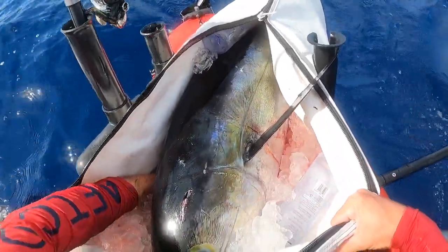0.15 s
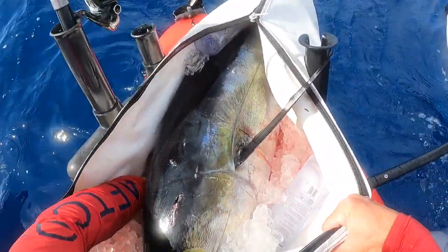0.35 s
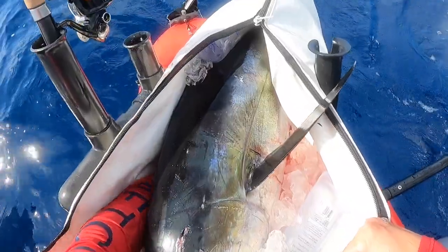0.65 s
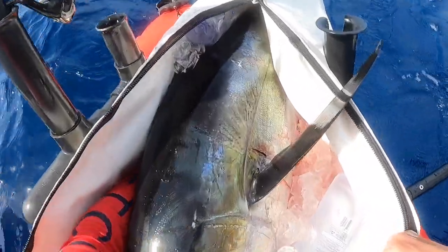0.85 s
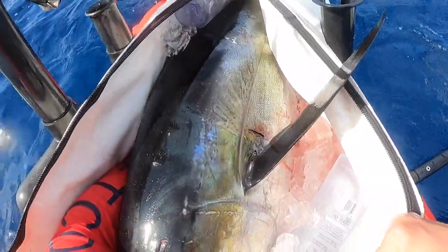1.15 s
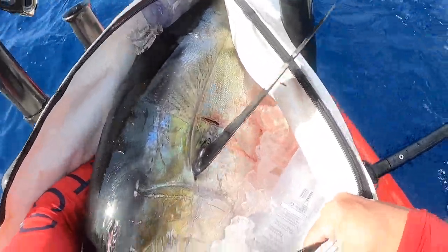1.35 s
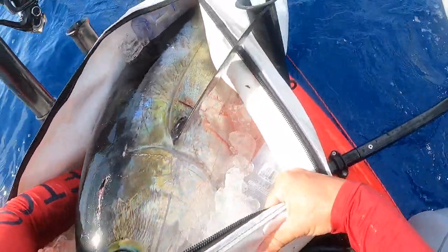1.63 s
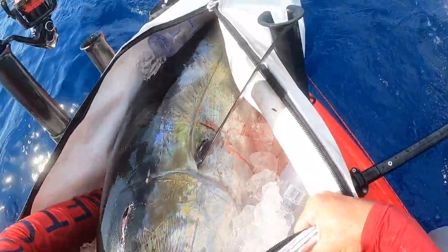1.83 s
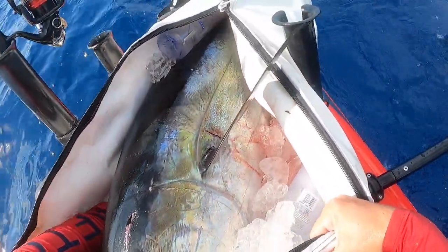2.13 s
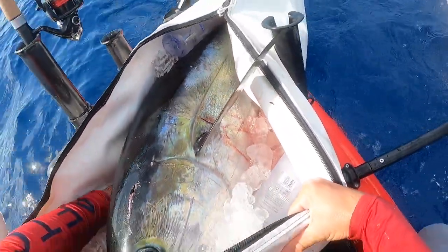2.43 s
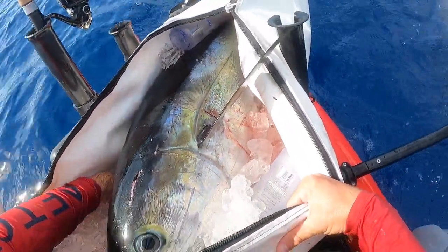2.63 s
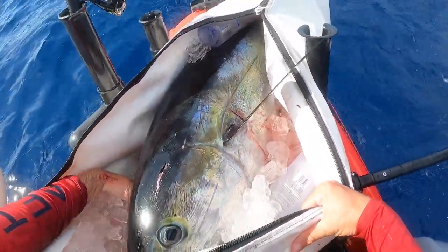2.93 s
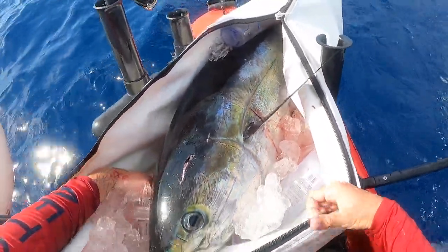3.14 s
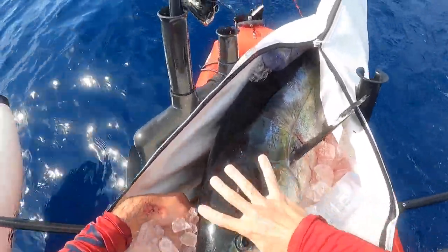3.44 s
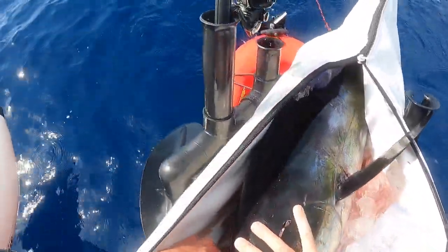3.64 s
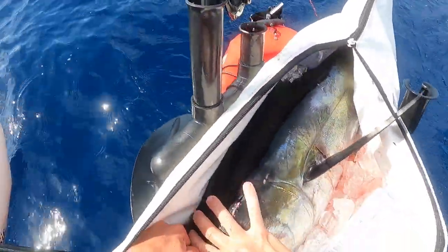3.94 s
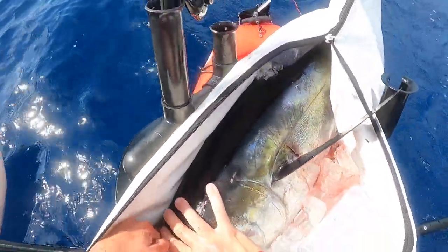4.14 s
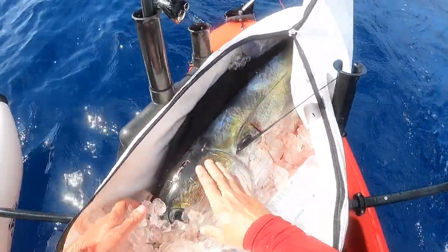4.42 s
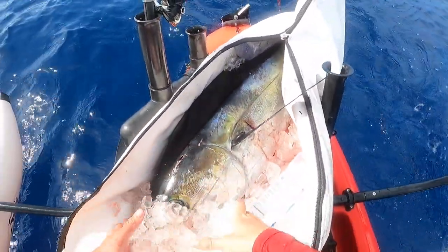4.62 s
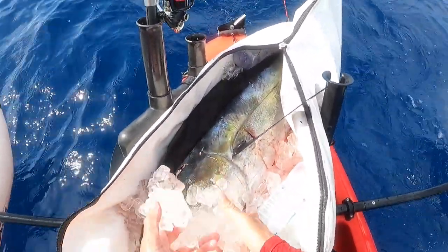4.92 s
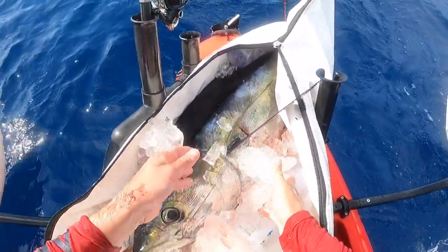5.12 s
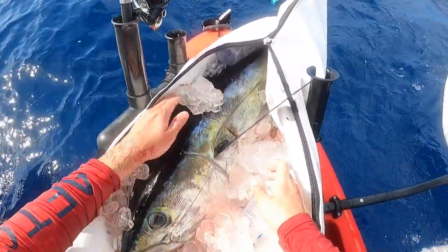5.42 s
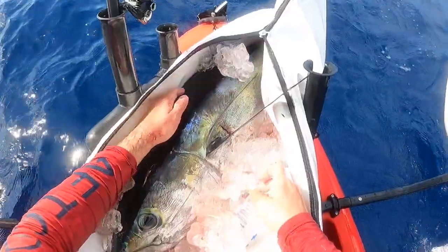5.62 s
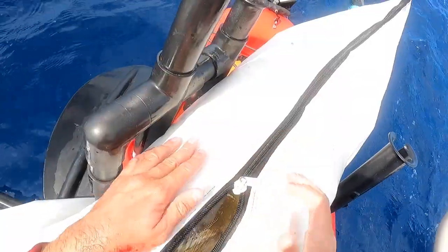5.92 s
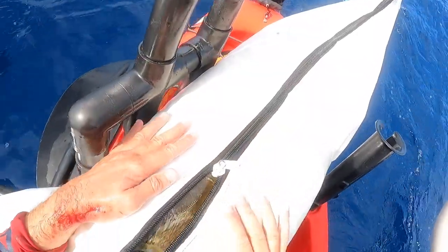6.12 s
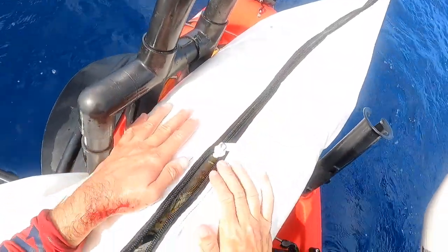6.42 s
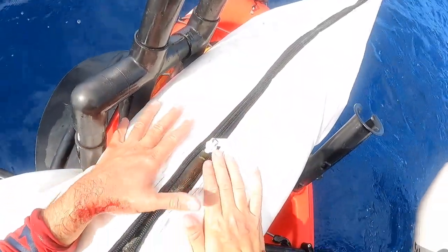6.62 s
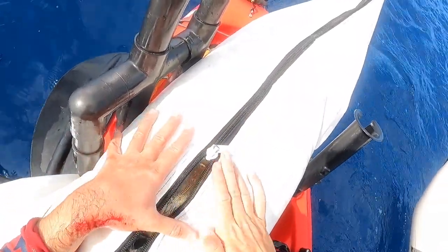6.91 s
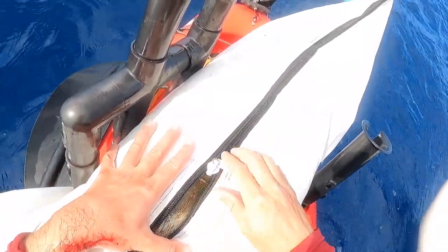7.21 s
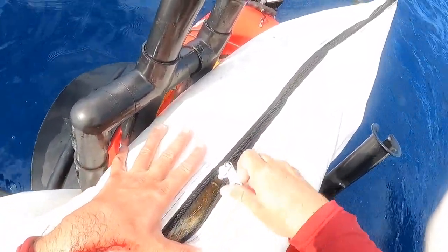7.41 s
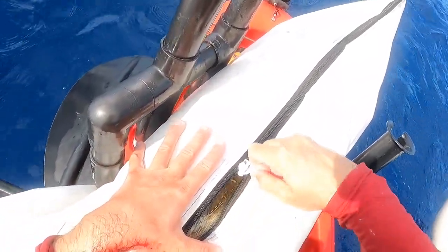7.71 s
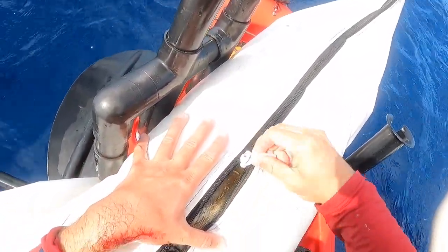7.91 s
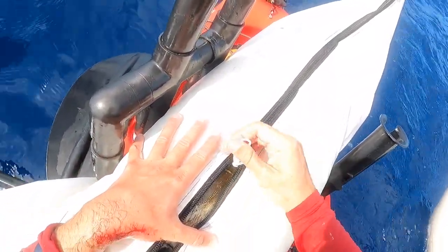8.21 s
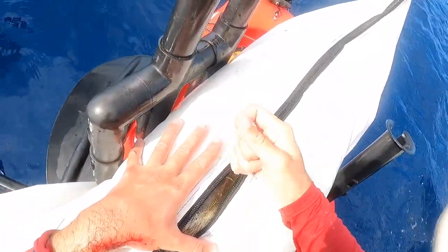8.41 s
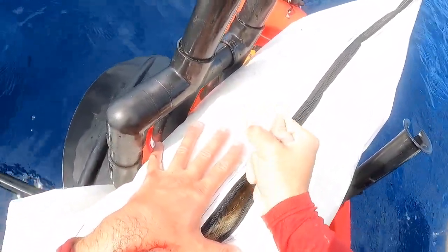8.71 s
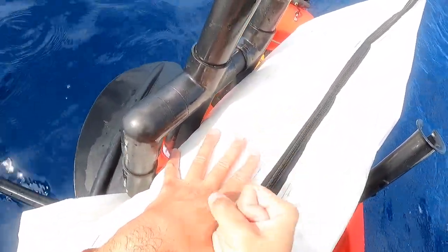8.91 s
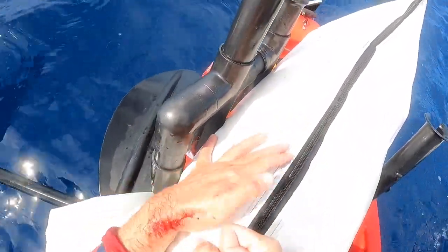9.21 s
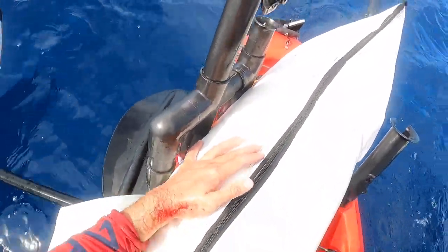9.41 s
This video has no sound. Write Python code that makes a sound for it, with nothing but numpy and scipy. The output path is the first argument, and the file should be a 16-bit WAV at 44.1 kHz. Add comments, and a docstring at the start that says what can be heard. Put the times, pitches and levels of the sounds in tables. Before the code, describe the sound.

Close to the microphone and outdoors, waves slosh against a hull under gusty low wind. Ice is raked over a fish in a padded bag, in dull shoves with sharp cube clatters. Then fabric rustles and ticks, damp palms stutter in low groans, a zipper tab clinks brightly, teeth tock slowly and quick zips finish. Almost mono first, a little wider later, dry.

```python
"""On a kayak at sea, water washes along the hull and wind buffets the microphone.
Hands rake ice over a fish in an insulated bag, judder over its wet cover, then tug the heavy
zipper shut in short strokes; the metal pull tab clinks in between. Wind, water and rubbing are
shaped noise, with tiny damped rings in all but the wind; impacts are noise bursts in resonators;
strokes are stick-slip pulse trains driving the bag panel, the slider and the teeth."""
import sys
import numpy as np
from scipy import signal
from scipy.fft import rfft, irfft, next_fast_len
from scipy.io import wavfile
from scipy.ndimage import map_coordinates

SR = 44100
rng = np.random.default_rng(int(sys.argv[2]) if len(sys.argv) > 2 else 0)


def log_audio(samples):
    """Write samples as a 16-bit WAV file to the path given in sys.argv[1]."""
    # one column per channel
    frames = np.atleast_2d(samples).T
    # limit to full scale, then quantise
    limited = np.clip(frames, -1, 1)
    pcm = np.round(limited * 32767).astype(np.int16)
    wavfile.write(sys.argv[1], SR, pcm)


N = 421155  # length in samples


def amp(db):
    """Logarithmic level: decibels to amplitude gain."""
    return 10 ** (np.asarray(db) / 20)


def unit(x):
    """Normalisation by power: scale to rms 1."""
    return x / np.sqrt(np.mean(x ** 2) + 1e-20)


def peaked(x):
    """Normalisation by crest: scale to peak 1."""
    return x / (np.abs(x).max() + 1e-20)


def curves(rows, outside=None):
    """Linear interpolation: one value per sample for each column after the time."""
    s, *columns = np.transpose(rows)
    t = np.arange(N) / SR
    return [np.interp(t, s, column, outside, outside) for column in columns]


def wobble(rate, size=N):
    """Band-limited fluctuation: a smooth random curve with `rate` knots a second."""
    knots = rng.standard_normal(int(size * rate / SR) + 4)
    return map_coordinates(knots, [np.arange(size) * rate / SR])


def filtered(x, response):
    """Linear filtering: the spectrum of x times a response of frequency."""
    n = x.shape[-1]
    m = next_fast_len(n + SR // 8)
    return irfft(rfft(x, m) * response(np.fft.rfftfreq(m, 1 / SR)), m)[..., :n]


def colour(points, hz):
    """Spectral envelope: gain through (Hz, dB) points, interpolated over log frequency."""
    f, db = np.transpose(points)
    return amp(np.interp(np.log(hz + 1), np.log(f + 1), db))


def ring(x, modes):
    """Modal superposition: parallel (Hz, width, dB) resonances, alternating in sign."""
    def response(f):
        total = 0
        for k, (centre, width, db) in enumerate(modes):
            damping = 1j * f * width
            total = total + (-1) ** k * amp(db) * damping / (centre * centre - f * f + damping)
        return total
    return filtered(x, response)


def soften(x, edge_hz, order=2):
    """High-frequency loss: a causal low-pass."""
    return signal.sosfilt(signal.butter(order, min(edge_hz, SR / 2 - 1), fs=SR, output="sos"), x)


def add(track, s, x):
    """Superposition: mix x into the track at time s."""
    part = track[max(round(s * SR), 0):][:len(x)]
    part += x[:len(part)]


def burst(t60):
    """Impact excitation: noise that decays exponentially by 60 dB in t60 seconds."""
    t = np.arange(SR // 8) / SR
    return rng.standard_normal(len(t)) * amp(-60 * t / t60)


def swells(rows, attack_s, release_s):
    """Energy addition: overlapping swells in dB; attack and release each span 20 dB."""
    t = np.arange(0, N, 64) / SR
    start, hold, *levels = np.transpose(rows)[:, :, None]
    before = np.maximum(start - t, 0) / attack_s
    after = np.maximum(t - start - hold, 0) / release_s
    fade_db = -20 * (before + after)
    totals = [10 * np.log10(np.sum(amp(db + fade_db) ** 2, axis=0) + 1e-12) for db in levels]
    return curves(np.transpose([t] + totals))


def grains(rate, cycles, spread_db, glide):
    """Granular superposition: tiny damped rings of random pitch and size, flat in spectrum, rms 1."""
    when, pitch, size, life = rng.random((int(rate * N / SR), 4)).T[:, :, None]
    hz = np.geomspace(150, 14000, 1024)[(pitch * 1023).astype(int)]
    k = np.arange(SR // 100)
    age = k * hz / SR / (cycles * (.5 + life))
    # an exponential spread of levels; the factor hz flattens the spectrum
    strength = amp(spread_db * np.minimum(-np.log(1 - size), 4)) * hz
    tone = np.sin(2 * np.pi * hz * k / SR * (1 + glide * np.minimum(age, 2)))
    waves = strength * np.exp(-age) * (1 - k / len(k)) * tone
    return unit(np.bincount(((when * N).astype(int) + k).ravel(), waves.ravel())[:N])


def texture(levels_db, spectrum, grain, share, split_hz, flutter_db):
    """Two-band modulation: grains on noise, low and high parts fluttering partly together."""
    share = np.clip(share, 0, 1)
    source = np.sqrt(share) * grain + np.sqrt(1 - share) * rng.standard_normal(N)

    def low(hz):
        return 1 / (1 + (hz / split_hz) ** 4)
    body = unit(filtered(source, lambda hz: colour(spectrum, hz) * low(hz)))
    top = unit(filtered(source, lambda hz: colour(spectrum, hz) * (1 - low(hz))))
    shared = wobble(45)
    out = np.zeros(N)
    for part, db in zip((body, top), levels_db):
        out = out + part * amp(db + flutter_db * (shared + wobble(70)))
    return out


# Spectrum of the buffeting. Each row: frequency in Hz, relative density in dB per Hz.
BUFFET_SPECTRUM = [(15, 2.5), (38, 3), (100, -2), (220, -21), (480, -62.5)]
# The breeze between gusts, dropping late on. Each row: time in seconds, level in dB before flutter.
BREEZE_LEVELS = [(1, -48.5), (3.0, -36), (5.6, -41), (7.3, -53.5), (8.3, -56), (9.3, -47)]
# Gusts on the microphone. Each row: start in seconds, hold in seconds, level in dB before flutter.
WIND_GUSTS = [(0.05, 0.68, -29), (3.52, 0.58, -23), (4.33, 0.095, -28), (4.74, 0.65, -34),
              (5.82, 0.11, -36.5), (6.06, 0.26, -27), (6.8, 1.0, -42.5), (9.42, 0.13, -30.5)]
GUST_ATTACK_S, GUST_RELEASE_S = 0.062, 0.16


def wind():
    """Turbulent pressure: lumpy low buffeting in gusts over a breeze, partly different at each port."""
    ports = unit(filtered(rng.standard_normal((2, N)), lambda hz: colour(BUFFET_SPECTRUM, hz)))
    breeze = amp(curves(BREEZE_LEVELS)[0])
    gusts = amp(swells(WIND_GUSTS, GUST_ATTACK_S, GUST_RELEASE_S)[0])
    strength = np.hypot(breeze, gusts)
    mid, side = ports * strength * amp(2.1 * wobble(15))
    return mid + np.array([side, -side]) * amp(-9.0)


# Spectrum of the wash. Each row: frequency in Hz, relative density in dB per Hz.
WASH_SPECTRUM = [(60, -10.5), (180, 0.5), (350, -4.5), (1100, -6.5), (1800, -5.5), (2800, -12.5),
                 (3800, -16.5), (8500, -31.5), (11000, -47), (15500, -55)]
# Waves along the hull, the first a long low wash under the rest.
# Each row: start in seconds, hold in seconds, slosh (low band) and spray (high band) in dB before flutter.
HULL_WAVES = [(0, 2.75, -34, -40.5), (1.125, 0.08, -23.5, -27.5), (1.1, 1.61, -34, -36),
              (1.41, 0.027, -27.5, -31), (1.55, 0.26, -27, -30), (1.65, 0.065, -27.5, -28.5),
              (1.87, 0.14, -31, -31.5)]
WAVE_ATTACK_S, WAVE_RELEASE_S = 0.084, .12


def water():
    """Bubble resonance: a wash full of small bubbles whose pitch rises as they surface."""
    bubbles = grains(rate=600, cycles=5, spread_db=3, glide=0.08)
    levels_db = swells(HULL_WAVES, WAVE_ATTACK_S, WAVE_RELEASE_S)
    return texture(levels_db, WASH_SPECTRUM, bubbles, share=0.17, split_hz=974, flutter_db=1.0)


# How loosely the cubes tumble. Each row: time in seconds, looseness from 0 to 1.
LOOSENESS = [(.3, 0.63), (2.7, 0.32), (3.4, 0.11), (4.15, 0.17), (4.65, 0.37), (5.4, 0.37)]
# Spectrum of raked ice. Each row: frequency in Hz, relative density in dB per Hz.
RAKE_SPECTRUM = [(60, -29), (130, -4.5), (700, -7), (1600, -15.5), (3800, -19), (8500, -33), (11000, -47.5),
                 (15500, -56)]
# A hand rakes through the ice. Each row: start in seconds, hold in seconds, shove level in dB before flutter.
ICE_SCOOPS = [(0, 0.663, -45), (.11, 0.27, -40.5), (2.48, 0.1, -40), (2.665, 0.052, -28),
              (2.975, 0.13, -28), (3.21, 0.16, -34.5), (3.59, 0.11, -30.5), (3.81, 0.15, -21),
              (4.03, 0.098, -32.5), (4.48, 0.0081, -32), (4.66, 0.036, -31), (4.77, 0.099, -26.5),
              (5.02, 0.013, -26.5), (5.19, 0.024, -38), (5.29, 0.076, -29), (5.755, 0.027, -43)]
# Cubes keep settling between scoops. Each row: start in seconds, hold in seconds, level in dB before flutter.
ICE_SETTLING = [(2.877, 2.544, -35.5), (5.447, 0.18, -41)]
SCOOP_ATTACK_S, SCOOP_RELEASE_S = 0.077, 0.1
CRUNCH_DB, LOOSE_CRUNCH_DB = -12, 23.5  # crunch over shove in packed ice; what fully loose ice adds


def raked_ice():
    """Granular collisions: packed cubes crunch dully; loose ones clatter and sound brighter."""
    clicks = grains(rate=800, cycles=3.3, spread_db=3.0, glide=0)
    loose, = curves(LOOSENESS)
    shove_db, = swells(ICE_SCOOPS + ICE_SETTLING, SCOOP_ATTACK_S, SCOOP_RELEASE_S)
    crunch_db = shove_db + CRUNCH_DB + LOOSE_CRUNCH_DB * loose
    return texture((shove_db, crunch_db), RAKE_SPECTRUM, clicks, share=.35, split_hz=1560, flutter_db=1.6)


KNOCK_SAG, KNOCK_CYCLES = 0.96, 1.64  # share by which pitch falls; peak, in cycles of the starting pitch


def knock(hz):
    """Yielding panel: a blow on the padded bag, a few cycles whose pitch drops as the panel gives."""
    cycles = np.arange(SR // 8) / SR * hz * np.exp(0.12 * rng.standard_normal())
    age = cycles / KNOCK_CYCLES
    phase = cycles * (1 - KNOCK_SAG) + KNOCK_SAG * 2 * KNOCK_CYCLES * (1 - np.exp(-age / 2))
    return peaked(age * np.exp(-age) * np.sin(2 * np.pi * phase))


# Single cubes landing. Each row: time in seconds, crack peak in dB, knock in dB relative to the crack.
CUBE_LANDINGS = [(0.512, -25.5, 8), (2.6695, -13, -6), (3.066, -17, -9), (5.1026, -20.5, -1),
                 (5.199, -15, -3), (5.2134, -13, -18), (5.2853, -15, -2), (5.298, -21, 10.5),
                 (5.34, -10, -8), (5.3655, -15.5, 8.5), (5.384, -25, 11.5), (5.4471, -16.5, -9),
                 (5.523, -17.5, -9), (5.808, -22, -27), (6.598, -27.5, 11)]


def cubes():
    """Modal impact: each cube cracks at its own pitch and knocks the padded bag."""
    out = np.zeros(N)
    for s, db, knock_db in CUBE_LANDINGS:
        pitches = np.array([1100, 2250, 3370, 4680, 7920]) * np.exp(0.14 * rng.standard_normal(5))
        crack = soften(ring(burst(0.022), [(hz, 300, 0) for hz in pitches]), 5500, order=3)
        add(out, s, amp(db) * (peaked(crack) + amp(knock_db) * knock(587)))
    return out


# Small crests slap the hull. Each row: time in seconds, peak in dB.
HULL_SLAPS = [(.776, -18), (1.052, -12.5)]


def slaps():
    """Damped impact: a crest breaks on the hull in one short wet smack."""
    out = np.zeros(N)
    for s, db in HULL_SLAPS:
        smack = soften(ring(burst(0.069), [(660, 340, 0)]), 3300)
        add(out, s, amp(db) * peaked(smack))
    return out


WANDER_OCTAVES, WANDER_PER_S = .045, 80  # random drift of the slip rate: spread, knots per second
STROKE_PAD = SR // 20  # samples left for a stroke to ring out


def slip_train(rate, jitter, size_db):
    """Stick-slip: one pulse per slip or tooth at the given rate per sample, then room to ring out."""
    rate = rate * 2 ** (WANDER_OCTAVES * wobble(WANDER_PER_S, size=len(rate)))
    at = np.flatnonzero(np.diff(np.floor(np.cumsum(rate) / SR + .5)))
    slip, size = rng.standard_normal((len(at), 2)).T
    when = np.clip(at + jitter * slip * SR / rate[at], 0, len(rate)).astype(int)
    return np.bincount(when, amp((size_db + 3.5 * jitter) * size), len(rate) + STROKE_PAD)


# Resonances of the bag, slider and teeth. Each row: frequency in Hz, width in Hz, relative gain in dB.
BAG_MODES = [(113, 53, -2.5), (164, 106, -4.5)]
SLIDER_MODES = [(971, 150, 10.6), (1390, 280, 0.68), (1696, 180, 3.4)]
TEETH_MODES = [(2070, 650, 3), (3910, 250, 0.5), (6250, 4300, -2.5)]


def stroke(slips, rate, jitter, panel_hz, thump_gain, panel_db, slider_db, rasp_db):
    """Source and resonators: each slip shakes the bag panel, rings the zipper slider and scrapes."""
    decay = amp(-60 * np.arange(SR // 50) / SR / .013)
    scrape = signal.fftconvolve(slips, decay)[:len(slips)]
    scrape *= rng.standard_normal(len(slips))
    # the tauter the fabric is held, the higher the panel rings
    push = slips + (0.023 + 0.51 * abs(jitter)) * scrape
    panel = soften(ring(push, [(panel_hz, 0.79 * panel_hz, 0)]), 2.19 * panel_hz, order=3)
    # the scrape also thumps the whole bag
    thump = soften(ring(scrape, BAG_MODES), 380)
    # each new grip shifts the slider's resonances a little
    modes = [(hz * np.exp(.03 * rng.standard_normal()), width, db) for hz, width, db in SLIDER_MODES]
    slider = soften(ring(slips + .06 * scrape, modes), 2420, order=4)
    # faster and rougher slips scrape more brightly
    rasp = soften(ring(slips + 0.15 * scrape, TEETH_MODES), 14 * rate * (1 + 12 * abs(jitter)))
    rasp = soften(rasp, 9160, order=5)
    sound = amp(panel_db) * (unit(panel) + thump_gain * unit(thump))
    sound += amp(slider_db) * unit(slider) + amp(rasp_db) * unit(rasp)
    return np.sqrt(1 - STROKE_PAD / len(slips)) * sound


# Quick runs of a wet finger or of the slider over the teeth.
# Each row: slider and rasp in dB relative to the panel, then a list of points.
# Each point: time in seconds, nominal slips per second, panel level in dB.
QUICK_PULLS = [(-9, -21, [(3.25, 520, -34), (3.46, 285, -33)]), (-10.5, -17, [(7.149, 256, -27),
               (7.185, 490, -22.5), (7.205, 410, -34)]), (-1, -14, [(7.322, 410, -39), (7.338, 330, -27),
               (7.362, 580, -26), (7.395, 246, -28.5), (7.428, 550, -30), (7.445, 490, -43)]),
               (4, -7, [(8.226, 234, -51), (8.305, 140, -45.5)]), (-2.5, -12, [(8.925, 144, -26),
               (8.965, 171, -21.5), (8.985, 500, -21.5), (9.0, 400, -20.5), (9.025, 555, -20),
               (9.04, 405, -21.5), (9.062, 244, -28), (9.1, 480, -30)]), (-3, -10.5, [(9.115, 300, -31),
               (9.145, 450, -25.5), (9.175, 405, -27), (9.195, 310, -37)]),
               (-3.5, -8.5, [(9.315, 130, -26.5), (9.35, 316, -22.5), (9.378, 350, -22.5),
               (9.465, 432, -19.5), (9.49, 360, -20.5), (9.508, 366, -18.5), (9.525, 263, -22),
               (9.55, 210, -20.5)])]
PULL_JITTER, RUN_PANEL_HZ = .017, 500  # share of a slip period; resonance of the taut panel
PULL_THUMP_DB, RASP_DB_PER_OCTAVE = -10.5, 4  # the bag booms along; faster teeth scrape more


def pulls():
    """Stick-slip under tension: quick runs sing in the taut panel and rasp as they speed up."""
    out = np.zeros(N)
    for slider_db, rasp_db, points in QUICK_PULLS:
        s, rates, levels = np.transpose(points)
        t = np.arange(s[0] * SR, s[-1] * SR + STROKE_PAD) / SR
        rate, db = np.interp(t, s, rates), np.interp(t, s, levels)
        slips = slip_train(rate[:-STROKE_PAD], PULL_JITTER, size_db=1)
        rasp = db + rasp_db + RASP_DB_PER_OCTAVE * np.log2(rate / rate.mean())
        thump = amp(PULL_THUMP_DB)
        add(out, s[0], stroke(slips, rate.mean(), PULL_JITTER, RUN_PANEL_HZ, thump, db, db + slider_db, rasp))
    return out


# Spectrum of the rubbed cover. Each row: frequency in Hz, relative density in dB per Hz.
RUSTLE_SPECTRUM = [(70, -9.5), (150, -3), (300, -9), (1000, -16), (6500, -20), (9000, -29), (11500, -48),
                   (15500, -57)]
# Palms press and slide on the cover, the first a light touch throughout.
# Each row: start in seconds, hold in seconds, rub (low band) and rustle (high band) in dB before flutter.
PALM_PRESSES = [(5.75, 4.5, -45.5, -54.5), (5.88, 0.8, -39, -47.5), (6.27, 0.11, -30.5, -42.5),
                (6.8, 0.42, -34.5, -50.5), (7.78, 0.058, -42, -78), (8.01, 0.11, -49, -80),
                (8.92, 0.72, -37.5, -49.5)]
PRESS_ATTACK_S, PRESS_RELEASE_S = 0.062, 0.093


def cover():
    """Friction noise: the stiff fabric rubs and crackles under the palms, spread a little to both sides."""
    levels_db = swells(PALM_PRESSES, PRESS_ATTACK_S, PRESS_RELEASE_S)

    def patch():
        """Crumpling: one independent patch of rub and crackle."""
        crackle = filtered(grains(rate=900, cycles=5, spread_db=5, glide=0), lambda hz: hz > 1000)
        return texture(levels_db, RUSTLE_SPECTRUM, crackle, share=0.39, split_hz=1410, flutter_db=2.5)
    return patch() + patch() * amp(-15.5) * np.array([[1], [-1]])


# The stiff cover snaps. Each row: time in seconds, peak in dB before panning.
COVER_SNAPS = [(6.013, -20), (6.608, -23), (6.659, -29), (6.81, -27), (8.395, -27.5), (9.229, -42)]


def snaps():
    """Snap-through buckling: a crease of the stiff cover flips with a dry tick."""
    out = np.zeros(N)
    for s, db in COVER_SNAPS:
        tick = soften(ring(burst(0.0086), [(2600, 1500, 0)]), 5800)
        add(out, s, amp(db) * peaked(tick))
    return out


# Resonances of the tab. Each row: frequency in Hz, width in Hz, mean relative gain in dB.
METAL_MODES = [(4400, 600, -0.5), (5250, 700, -2), (6720, 430, 10.5), (9200, 165, 6)]
# Pull tab clinks. Each row: time in seconds, clink peak in dB before panning, thud in dB relative
# to the clink, treble edge in Hz (low when a finger damps the tab).
TAB_CLINKS = [(6.039, -20.5, -31, 14000), (6.061, -21, -19, 14000), (7.329, -19, -35, 11000),
              (7.415, -20, -30, 14000), (7.426, -13.5, -38, 14000), (7.4466, -19, -37, 14000),
              (7.7623, -8.5, -12, 13900), (8.359, -13.5, -44, 5700), (8.519, -15.5, -13.5, 14000)]
# Let go, the tab rings freely. Each row: time in seconds, peak in dB before panning.
FREE_TAB_RINGS = [(8.447, -24.5)]


def pull_tab():
    """Modal impact: the metal tab clinks on the slider, newly coloured each time, and thuds on the bag."""
    out = np.zeros(N)
    for s, db, thud_db, edge_hz in TAB_CLINKS:
        modes = [(hz, width, level + 1.0 * rng.standard_normal()) for hz, width, level in METAL_MODES]
        clink = soften(ring(burst(0.018), modes), edge_hz, order=8)
        add(out, s, amp(db) * (peaked(clink) + amp(thud_db) * knock(232)))
    for s, db in FREE_TAB_RINGS:
        free = ring(burst(0.0026), [(3980, 55, 3), (9240, 53, -11)])
        add(out, s, amp(db) * peaked(free))
    return out


# A wet palm judders slowly on the cover. Each row: start in seconds, length in seconds,
# nominal slips per second, glide in octaves, jitter as a share of the slip period,
# panel resonance in Hz, panel level in dB, rasp level in dB.
PALM_JUDDERS = [(6.306, 0.092, 179, -0.046, 0.13, 244, -18.5, -36),
                (6.726, 0.058, 198, -0.083, 0.0038, 198, -16, -29),
                (6.836, 0.025, 210, -0.11, 0.082, 260, -28.5, -41.5),
                (6.867, 0.054, 232, 0.1, 0.0029, 200, -20, -31.5),
                (7, .08, 140, 0.083, 0.077, 448, -24.5, -38),
                (7.095, 0.027, 150, -0.27, 0.043, 380, -22, -43)]
JUDDER_ARCH, JUDDER_SLIDER_DB = .26, -40  # octaves slower at both ends; the slider rattles along
STROKE_THUMP = 2.6  # bag thump gain at full jitter
STROKE_SWELL = 0.19  # exponent: how roundly the force rises and falls within a stroke


def judders():
    """Stick-slip at low tension: a wet palm's slow judders boom in the slack panel."""
    out = np.zeros(N)
    for s, length, rate, glide, jitter, panel_hz, db, rasp_db in PALM_JUDDERS:
        u = np.linspace(0, 1, int(length * SR))
        octaves = glide * (u - .5) - JUDDER_ARCH * (2 * u - 1) ** 2
        slips = slip_train(rate * 2 ** octaves, jitter, size_db=1.5)
        force = np.pad(np.abs(np.sin(np.pi * u)) ** STROKE_SWELL, (0, STROKE_PAD))
        thump = STROKE_THUMP * np.sqrt(abs(jitter))  # uneven slips thump more
        add(out, s, stroke(slips * force, rate, jitter, panel_hz, thump, db, JUDDER_SLIDER_DB, rasp_db))
    return out


# The slider creeps or jerks over single teeth. Each row: time in seconds, relative level in dB.
TOOTH_TOCKS = [(6.632, -20), (8.614, -25), (8.689, -25.5), (8.729, -25.5), (8.766, -21), (8.805, -20.5),
               (8.832, -18.5), (8.845, -17.5), (8.862, -19.5), (8.886, -18), (8.903, -21.5)]


def creep():
    """Discrete impacts: under slow pull the teeth pass one by one, each a separate tock."""
    out = np.zeros(N)
    for s, db in TOOTH_TOCKS:
        panel = knock(400)
        slider = peaked(soften(ring(burst(0.01), SLIDER_MODES), 1600, order=4))
        rasp = peaked(soften(ring(burst(0.042), TEETH_MODES), 7600, order=4))
        add(out, s, amp(db - 6.0) * (panel + .9 * slider + 0.43 * rasp))
    return out


# A wet fingertip shifts. Each row: time in seconds, base pitch in Hz, peak in dB before panning.
FINGER_SQUEAKS = [(7.213, 690, -24.5), (8.102, 1066, -41), (8.491, 1490, -35), (8.651, 1026, -36),
                  (8.766, 1050, -28.5)]
SQUEAK_S, SQUEAK_RISE, SQUEAK_WAVER = 0.035, .14, 0.117  # length; shares by which pitch climbs and wavers


def squeaks():
    """Frictional oscillation: wet fingertips shift on the cover in tiny rising squeaks."""
    out = np.zeros(N)
    u = np.linspace(0, 1, int(SR * SQUEAK_S))
    for s, hz, db in FINGER_SQUEAKS:
        pitch = hz * (1 + SQUEAK_RISE * u + SQUEAK_WAVER * wobble(300, size=len(u)))
        tone = np.sin(2 * np.pi * np.cumsum(pitch) / SR)
        add(out, s, amp(db) * np.sin(np.pi * u) ** 2 * tone)
    return out


def scene():
    """Free field: open air, no echo; the bag and its zipper lie slightly to the right."""
    surroundings = wind() + water() + slaps() + raked_ice() + cubes()
    bag = pulls() + cover() + snaps() + pull_tab() + judders() + creep() + squeaks()
    return surroundings + bag * amp([[-.8], [.7]])  # left and right gain in dB


def record(dry):
    """Mid-side width and band limit: almost mono, then the stereo image opens; no top treble."""
    mid = dry.mean(axis=0)
    width = curves([(5.77, 0.003), (5.82, 1)])[0]
    return filtered(mid + width * (dry - mid), lambda hz: hz < 15700)


dry = scene()
out = record(dry)
log_audio(out)
```